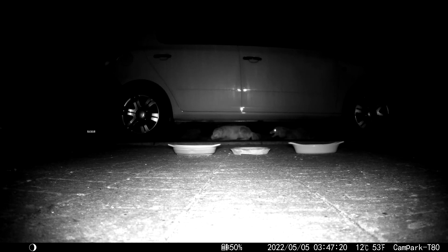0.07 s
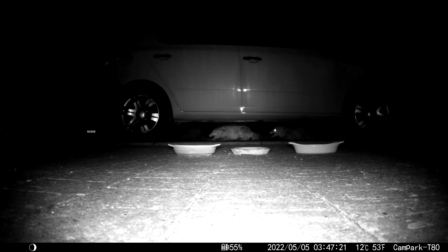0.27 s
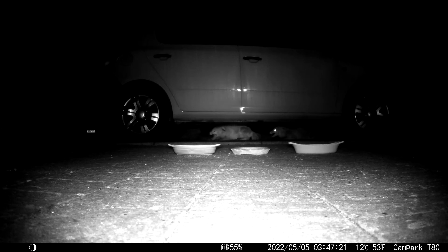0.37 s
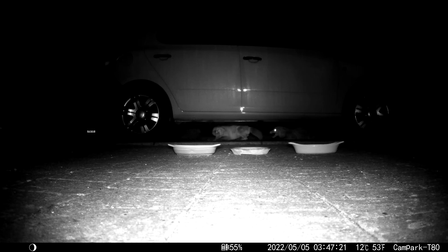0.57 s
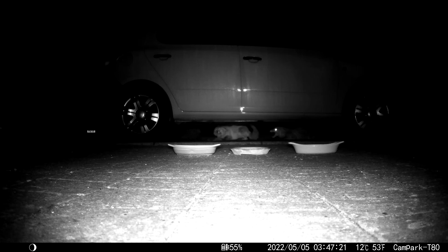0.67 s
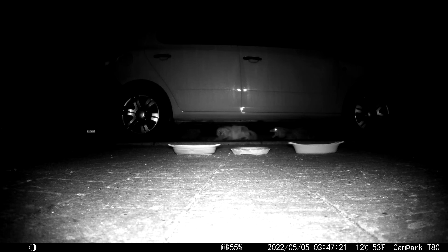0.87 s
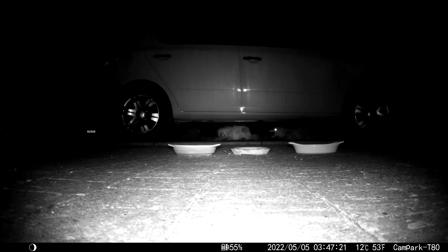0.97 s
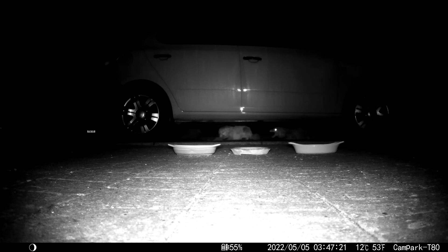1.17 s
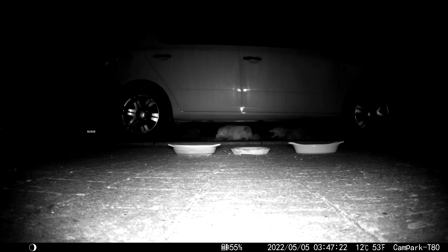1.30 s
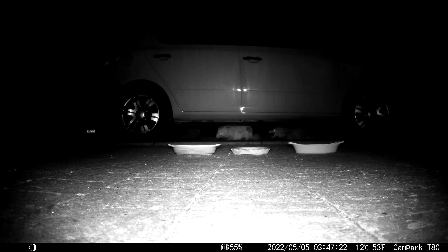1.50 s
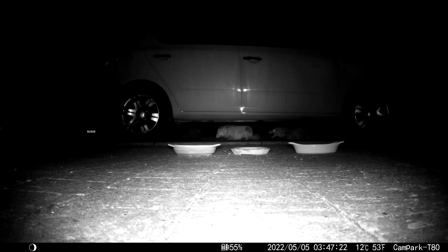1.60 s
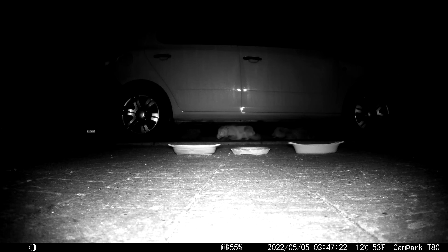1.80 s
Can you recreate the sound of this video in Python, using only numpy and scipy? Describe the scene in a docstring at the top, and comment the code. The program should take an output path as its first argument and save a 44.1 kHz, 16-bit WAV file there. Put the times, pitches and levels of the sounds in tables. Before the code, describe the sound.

A fox screams twice at night, with throaty clicks between the calls.

```python
"""Over a soft night rumble, a fox's long scream climbs, breaks an octave down and ends in a rasp.
Throaty clicks lead to a shorter, falling scream that trails off in a low whine.
The voice comes from vibrating vocal folds, the rasp from air sputtering through the mouth.
A parked car and the walls around the driveway throw the calls back."""
import sys
import numpy as np
from scipy import signal
from scipy.fft import rfft, irfft
from scipy.io import wavfile

SR = 44100
rng = np.random.default_rng(int(sys.argv[2]) if len(sys.argv) > 2 else 0)


def transcribe(signal):
    """Save signal, clipped to [-1, 1], as a 16-bit WAV file at the path in sys.argv[1]."""
    frames = np.atleast_2d(signal).T
    limited = np.clip(frames, -1, 1)
    pcm = np.round(limited * 32767).astype(np.int16)
    wavfile.write(sys.argv[1], SR, pcm)


N = 81585

# The night's tone. Each row: frequency in Hz, relative level in dB.
NIGHT_TONE = [(25, -11), (65, -1.5), (180, -4), (400, -9),
              (1000, -16), (2500, -21), (5500, -18.5), (14500, -30.5)]
# Nearby echoes. Each row: delay in seconds, level in dB.
ECHOES = [(.0052,-15.5),(0.0114,-11.5),(0.0206,-11),(.027,-21.5),(0.036,-29),(.052,-19.5)]
# The yard's ring. Each row: frequency in Hz, seconds to fade by 60 dB.
YARD_RING = [(600,0.62),(1400,0.86),(2000,0.8),(3500,0.83),(7000,0.59),(12000,0.13)]
# Each row: start in seconds, level in dB, pitch in Hz, share of air from 0 to 1.
CLICKS = [(1.014,-24,1200,0.37),(1.058,-37,1213,.5),(1.0975,-37.5,1103,0.43),(1.139,-29.5,1200,0.22),(1.188,-31.5,1148,.25),(1.2466,-30,1162,.25),(1.299,-32,1142,0.26),(1.354,-31.5,1102,0.12),(1.414,-26.5,1090,0)]
# The throat's tone in clicks and low calls. Each row: frequency in Hz, boost in dB.
CLICK_THROAT = [(500,-23),(1150,-4),(2300,1.5),(2850,-5),(3450,8.5),(4700,-14),(6000,-35),(8000,-17),(9500,-69)]
LOW_THROAT = [(450,29.5),(800,12),(1200,3),(2500,0),(4000,-1),(6000,1.5),(9000,-85)]
# The screams' low endings. Each row: time in seconds, pitch in Hz, level in dB.
GROWL = [(.925,1105,-30),(.937,899,-31.5),(.948,675,-33),(.975,562,-45)]
WHINE = [(1.62,934,-46.5),(1.67,874,-42),(1.72,830,-37),(1.745,751,-47),(1.808,683,-45),(1.818,512,-43.5),(1.85,500,-54)]
# Rushing air. Each row: time in seconds, level in dB.
LONG_BREATH = [(.17,-52),(.26,-42),(.52,-41),(.78,-45),(.915,-42),(.935,-30),(.965,-34),(1.03,-48),(1.06,-80)]
SHORT_BREATH = [(1.37,-62),(1.43,-46),(1.465,-31),(1.52,-43),(1.62,-38),(1.65,-55),(1.85,-68)]
# Throat snaps as the short scream breaks up. Each row: start in seconds, level in dB.
SNAPS = [(1.47,-24),(1.637,-26.5)]
# The screams' tunes. Each row: time in seconds, pitch in Hz.
LONG_PITCH = [(.175,1417),(.187,1503),(.219,1449),(.245,1532),(.3,1871),(.338,2030),(.4,2048),(.46,2108),(.485,2100),(.494,1976),(.597,2014),(.667,1982),(.745,2021),(.797,1977),(.825,1820),(.86,1387),(.9,1289),(.935,1160)]
SHORT_PITCH = [(1.368,1351),(1.385,1528),(1.412,1442),(1.44,1434),(1.462,1329),(1.484,1225),(1.555,1199),(1.6,1120),(1.65,1061),(1.69,1077),(1.72,971)]
# Each row: time in seconds, level of the base note in dB, level of its overtones in dB.
LONG_LEVEL = [(.177,-32,-27),(.191,-32,-28),(.198,-34.5,-38),(0.201,-31.5,-19.5),(0.217,-31,-21.5),(0.22,-44,-29),(0.222,-32.5,-17),(0.27,-16,-14.5),(0.307,-17.5,-12.5),(0.331,-24.5,-14.5),(0.346,-10.5,-12.5),(0.399,-13,-10.5),(0.485,-16.5,-12),(0.524,-9,-11),(0.571,-14,-13),(0.632,-16,-12.5),(0.661,-10.5,-9.5),(0.691,-12.5,-16),(0.802,-17.5,-14),(0.876,-24.5,-21.5),(.915,-25,-14.5),(0.929,-20.5,-20.5)]
SHORT_LEVEL = [(1.37,-24.5,-36),(1.385,-31,-16.5),(1.412,-20,-22),(1.434,-19.5,-7),(1.447,-14.5,-18),(1.467,-24,-8.5),(1.498,-20.5,-23.5),(1.537,-18,-19.5),(1.571,-22,-16),(1.601,-32,-30),(1.65,-28,-40),(1.721,-37.5,-47)]
# The throat's tone. Each row: frequency in Hz, boost in dB with the mouth open, then narrowed.
LONG_THROAT = [(400,-53,-38),(1000,-23.5,7),(1900,-6,-3),(2400,9,7.5),(3170,2,0),(3955,6,6),(4620,-3.5,-10),(5160,3,-11),(6230,-5.5,-8),(7360,-14,-2.5),(8360,-16,-14.5),(10200,-34,-31),(12100,-38,-35),(14400,-62,-63)]
SHORT_THROAT = [(350,-30,-30),(900,-10,-2),(2300,-11,-6.5),(2430,7,2),(2820,13,1),(3496,16.5,3),(4300,12,4),(5260,12.5,-4.5),(5920,1.5,13.5),(6840,-9,5),(7258,-7,-24),(8900,-19,-11),(11540,-20,-30.5),(14400,-48,-44)]
# Tones halfway between the overtones. Each row: time in seconds, relative level in dB.
OCTAVE_BREAK = [(.26,-86),(0.302,-12.5),(.41,-35.5),(0.481,-12),(0.498,6.5),(0.661,7),(0.783,5.5),(.81,-3.5),(0.842,-33)]
# Unsteady vocal folds. Each row: time in seconds, wobble as a share of the pitch.
JITTER = [(.18,.004),(.215,.01),(.3,.005),(.38,.002),(.78,.0013),(.85,.004),(1.4,.003),(1.47,.005),(1.54,.002),(1.62,.007),(1.68,.003)]

LONG_NARROWS_S, SHORT_NARROWS_S = (0.85, .905), (1.473, 1.525)  # the mouth narrows from, to
ONSET_S, RELEASE_S, CLICK_S = .005, 0.018, 0.0028
JITTER_HZ, TOP_HZ = 225, 15600
SHIMMER_DB_PER_JITTER, FLUTTER_DB_PER_JITTER = 170, 435


def amp(db):
    """Turns decibels into a gain."""
    return 10 ** (np.asarray(db) / 20)


def unit(x):
    """Scales a sound to an average (rms) level of 1."""
    return x / np.sqrt(np.mean(x ** 2) + 1e-20)


def curve(rows, t):
    """Reads each column of a time table at times t."""
    times, *columns = np.transpose(rows)
    return [np.interp(t, times, c) for c in columns]


def colour(points, hz):
    """Reads a frequency table, with octaves evenly spaced."""
    f, value = np.transpose(points)
    return np.interp(np.log(hz + 1), np.log(f + 1), value)


def noise(tone):
    """Noise with the given tone."""
    gains = amp(colour(tone, np.fft.rfftfreq(N, 1 / SR)))
    return unit(irfft(rfft(rng.standard_normal(N)) * gains, N))


def wobble(rate_hz):
    """Random wavering up to about this rate."""
    damping = 1 + (np.fft.rfftfreq(N, 1 / SR) / rate_hz) ** 4
    return unit(irfft(rfft(rng.standard_normal(N)) / damping, N))


def gate(rows, t):
    """Fades in at a table's first time and out at its last."""
    fade_in = np.clip((t - rows[0][0]) / ONSET_S + .5, 0, 1)
    return fade_in * np.clip((rows[-1][0] - t) / RELEASE_S + .5, 0, 1)


def night(level_db=-57):
    """A steady low rumble with a faint hiss."""
    return amp(level_db) * noise(NIGHT_TONE)


def yard(sound, tail_db=-22.5):
    """The car and walls add quick echoes, then a ring whose highs die first."""
    hz, t, spectrum = signal.stft(rng.standard_normal(SR), SR, nperseg=256)
    fade = amp(-60 * t / colour(YARD_RING, hz)[:, None])
    tail = signal.istft(spectrum * fade, SR, nperseg=256)[1][:SR]
    tail *= np.minimum(np.arange(SR) / SR / 0.016, 1)
    response = amp(tail_db) * tail / np.linalg.norm(tail)
    response[0] += 1  # the direct sound
    for delay, db in ECHOES:
        response[round(delay * SR)] += amp(db)
    return signal.fftconvolve(sound, response)[:N]


def stack(hz, multiples, db, smear=0.3184):
    """Adds tones at multiples of a pitch; the throat smears each pulse a little."""
    k = multiples[:, None]
    gains = amp(db) * (k * hz < TOP_HZ)
    waves = np.cos(2 * np.pi * k * np.cumsum(hz) / SR - smear * np.pi * k ** 2)
    return np.sqrt(2) * (gains * waves).sum(0) / np.sqrt((gains ** 2).sum(0) + 1e-20)


def voiced(hz, throat):
    """A note and its overtones pass through a throat held still."""
    k = np.arange(1, 10)
    return stack(hz, k, colour(throat, k[:, None] * hz))


def mouth_shapes(throat):
    """Splits a table into the open and the narrowed mouth's tone."""
    hz, wide_db, narrow_db = np.transpose(throat)
    return np.c_[hz, wide_db], np.c_[hz, narrow_db]


def clicks(rough=.025, sharpness=1.28):
    """A closed throat lets through puffs of air, each with a few cycles of voice."""
    out, time = np.zeros(N), np.arange(N) / SR
    waver = 1 + rough * wobble(rate_hz=565)
    air = noise(CLICK_THROAT)
    for start, db, hz, airy in CLICKS:
        age = (time - start) / CLICK_S  # the click peaks at age 1
        on = (age > 0) & (age < 10)
        swell = (age[on] * np.exp(1 - age[on])) ** sharpness
        voice = voiced(hz * waver[on], CLICK_THROAT)
        out[on] += amp(db) * swell * (np.sqrt(1 - airy) * voice + np.sqrt(airy) * air[on])
    return out


def low_call(rows, rough):
    """Slack vocal folds beat unevenly as the pitch sinks."""
    out, t = np.zeros(N), np.arange(N) / SR
    hz, db = curve(rows, t)
    opening = gate(rows, t)
    on = opening > 0
    hz *= 1 + rough * wobble(rate_hz=380)
    out[on] = voiced(hz[on], LOW_THROAT)
    return out * opening * amp(db + 3.08 * wobble(rate_hz=223))


def rasp(level, throat, narrowing, snaps=(), sputter_db=3, tone_share=0.69):
    """Air sputters through the narrowing mouth and takes on part of its tone."""
    t = np.arange(N) / SR
    wide, narrow = (noise(shape * [1, tone_share]) for shape in mouth_shapes(throat))
    narrowed = np.interp(t, narrowing, [0, 1])
    flow = gate(level, t) * amp(curve(level, t)[0] + sputter_db * wobble(JITTER_HZ))
    for start, db in snaps:
        flow += amp(db) * (t > start) * np.exp(-abs(t - start) / CLICK_S)
    return flow * (np.sqrt(1 - narrowed) * wide + np.sqrt(narrowed) * narrow)


def scream(pitch, level, throat, narrowing, octave_break=None, quarter_db=-32.5):
    """Tight vocal folds sound through a narrowing mouth."""
    out, time = np.zeros(N), np.arange(N) / SR
    opening = gate(level, time)
    on = opening > 0
    t = time[on]
    jitter = curve(JITTER, t)[0]
    hz = curve(pitch, t)[0] * (1 + jitter * wobble(JITTER_HZ)[on])
    base_db, overtone_db = curve(level, t)
    k = np.arange(2, 13.)  # multiples of the pitch
    between_db = 0
    if octave_break:  # every other beat differs, adding tones at half and faint quarter steps
        k = np.r_[k, np.arange(.5, 8), np.arange(.75, 4, .5)]
        between, quarter = (k % 1 > 0)[:, None], (k % .5 > 0)[:, None]
        between_db = between * curve(octave_break, t)[0] + quarter * quarter_db
    wide_db, narrow_db = (colour(shape, k[:, None] * hz) for shape in mouth_shapes(throat))
    mouth_db = wide_db + (narrow_db - wide_db) * np.interp(t, narrowing, [0, 1])
    # Unsteady folds make each overtone flutter on its own and the whole voice shimmer.
    flutter = wobble(rate_hz=63.6)
    flutters = np.array([np.roll(flutter, shift)[on] for shift in rng.integers(0, N, len(k))])
    overtones = stack(hz, k, mouth_db + between_db + FLUTTER_DB_PER_JITTER * jitter * flutters)
    shimmer = amp(SHIMMER_DB_PER_JITTER * jitter * wobble(rate_hz=113)[on])
    out[on] = shimmer * (amp(base_db) * stack(hz, np.ones(1), 0) + amp(overtone_db) * overtones)
    return out * opening


def scene():
    """The fox calls in the yard, over the night background."""
    long = scream(LONG_PITCH, LONG_LEVEL, LONG_THROAT, LONG_NARROWS_S, OCTAVE_BREAK)
    long += rasp(LONG_BREATH, LONG_THROAT, LONG_NARROWS_S)
    short = scream(SHORT_PITCH, SHORT_LEVEL, SHORT_THROAT, SHORT_NARROWS_S)
    short += rasp(SHORT_BREATH, SHORT_THROAT, SHORT_NARROWS_S, SNAPS)
    fox = long + low_call(GROWL, rough=.12) + clicks() + short + low_call(WHINE, rough=.04)
    return (yard(fox) + night())[None]


def record(dry, hardness=10):
    """Rounds off the loudest peaks, then cuts the highest treble."""
    rounded = dry / (1 + abs(dry) ** hardness) ** (1 / hardness)
    treble_cut = signal.firwin(511, TOP_HZ, window=("kaiser", 9), fs=SR)
    return signal.oaconvolve(rounded, treble_cut[None], "same")


dry = scene()
out = record(dry)
transcribe(out)
```